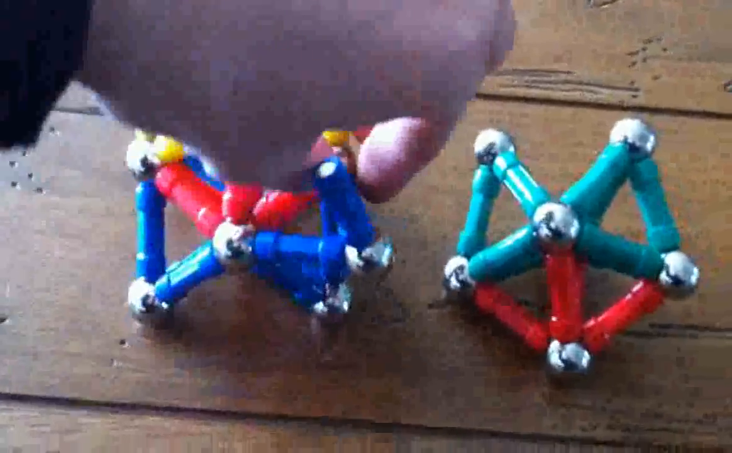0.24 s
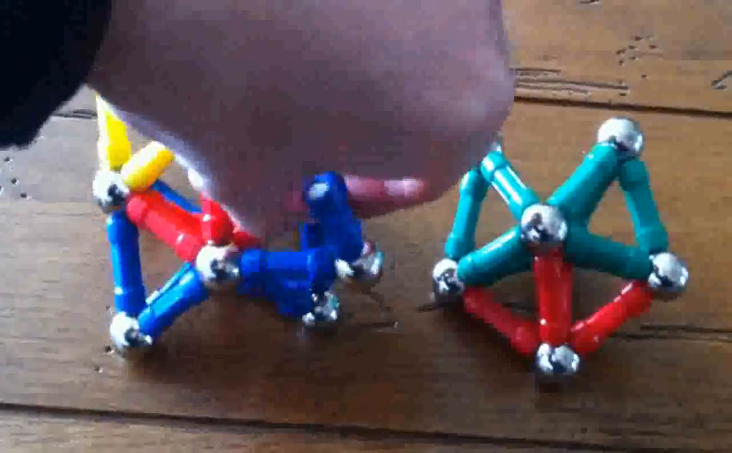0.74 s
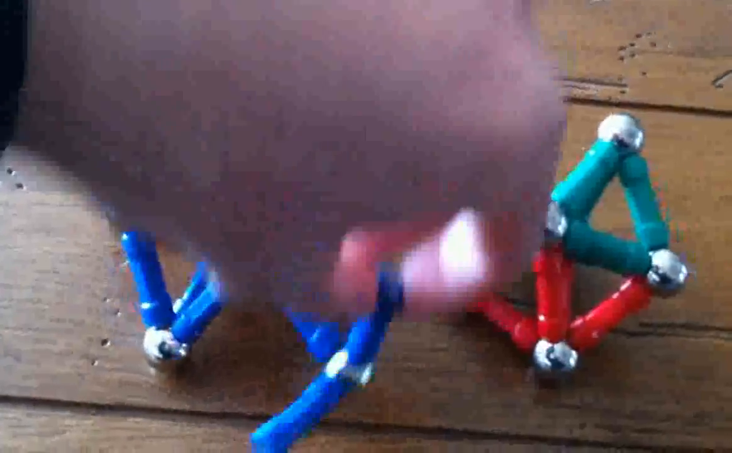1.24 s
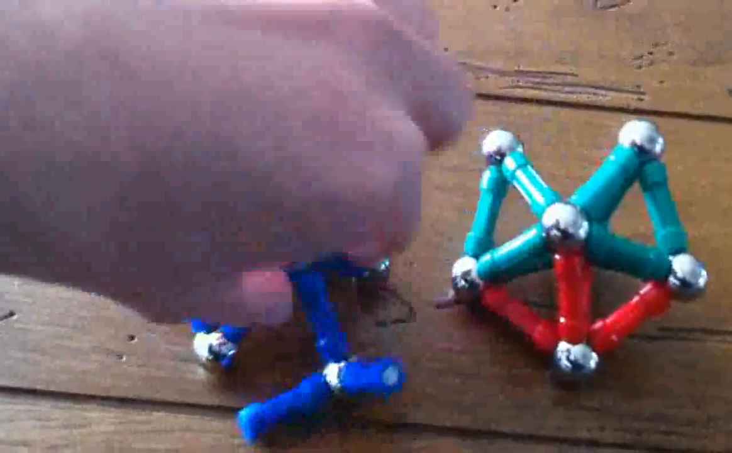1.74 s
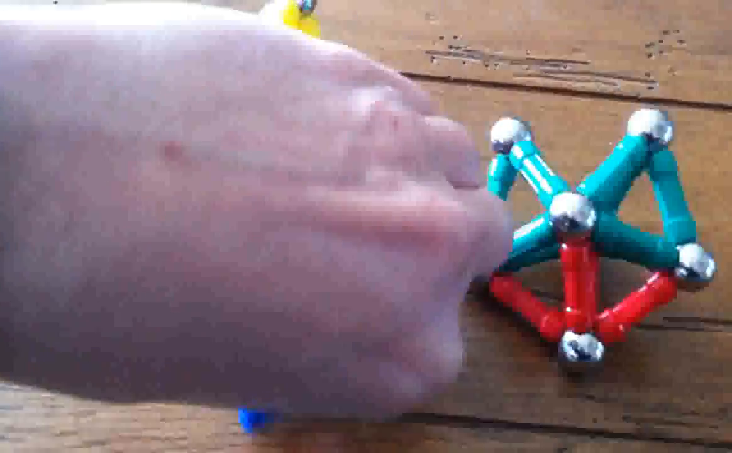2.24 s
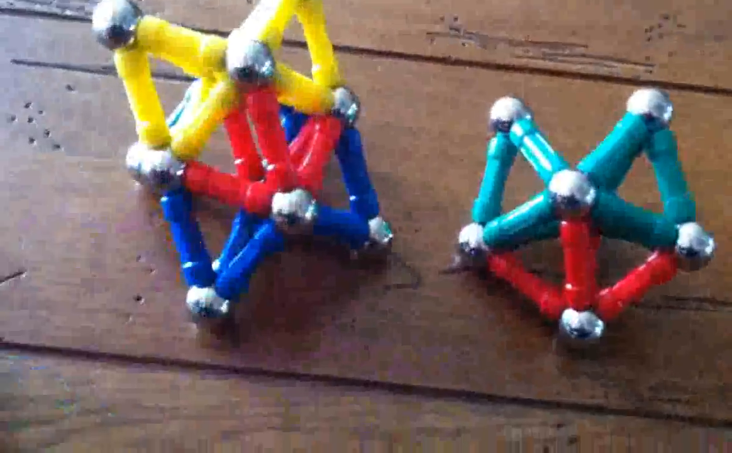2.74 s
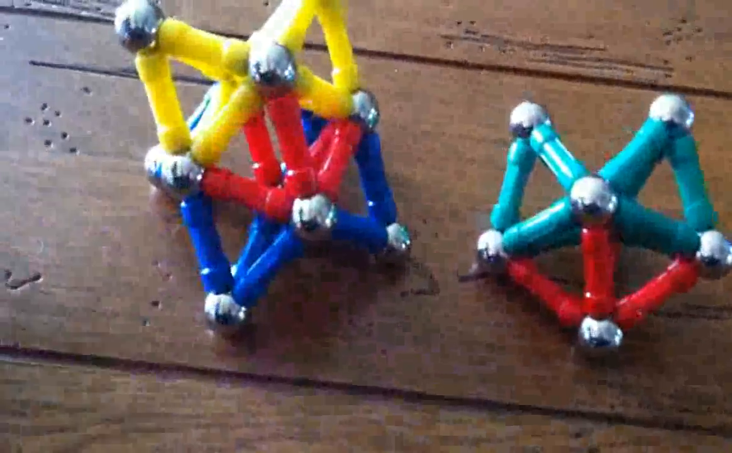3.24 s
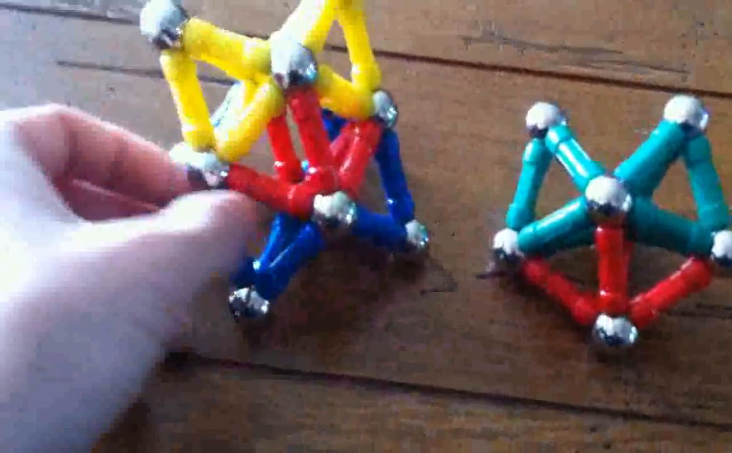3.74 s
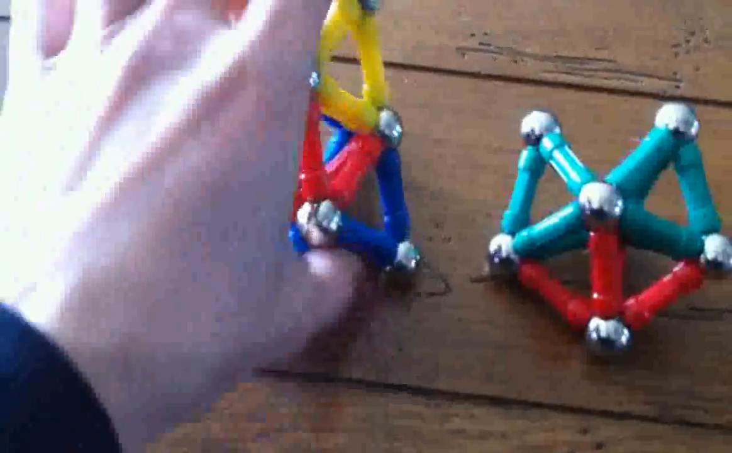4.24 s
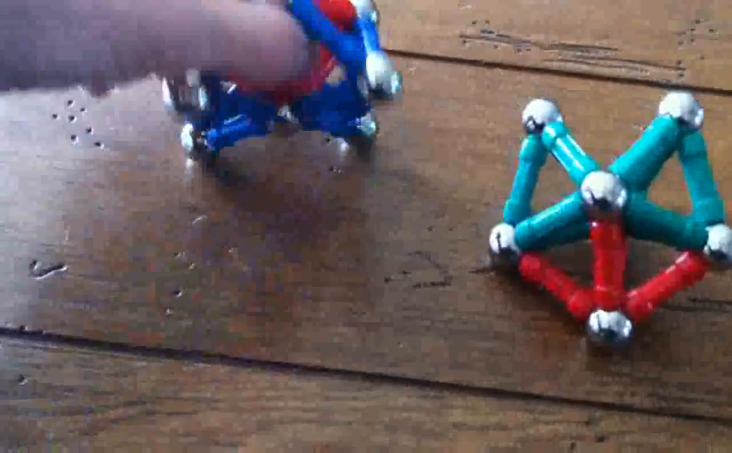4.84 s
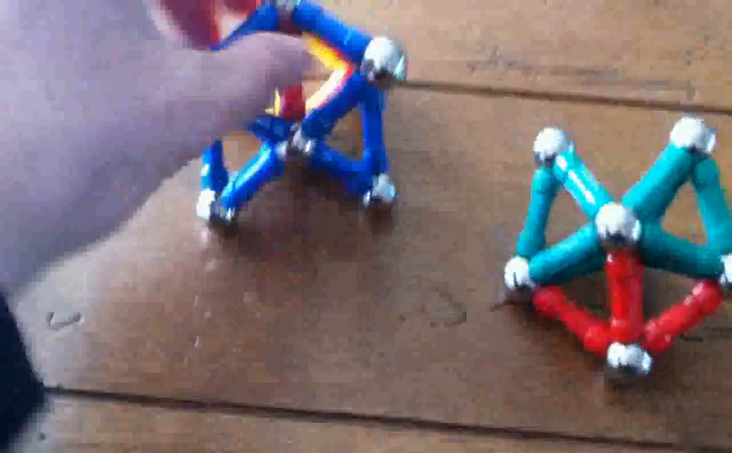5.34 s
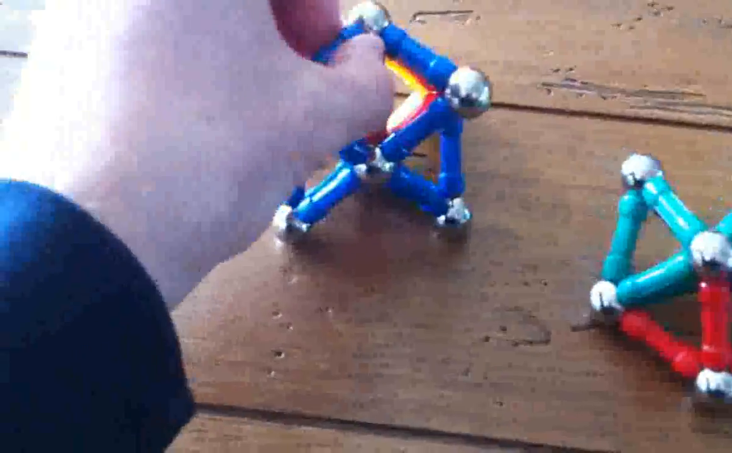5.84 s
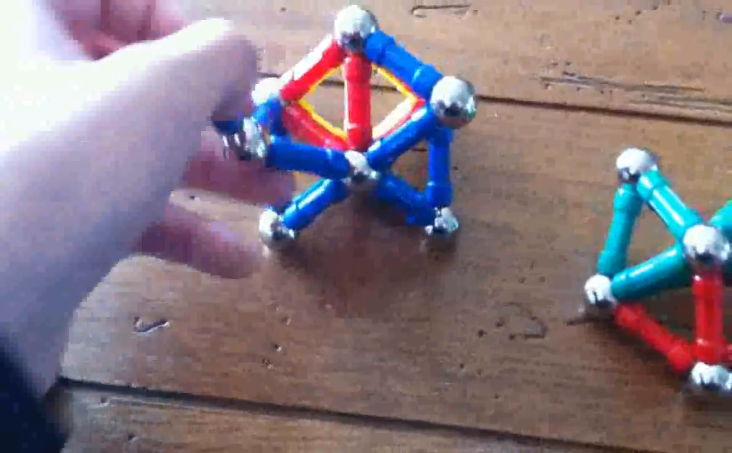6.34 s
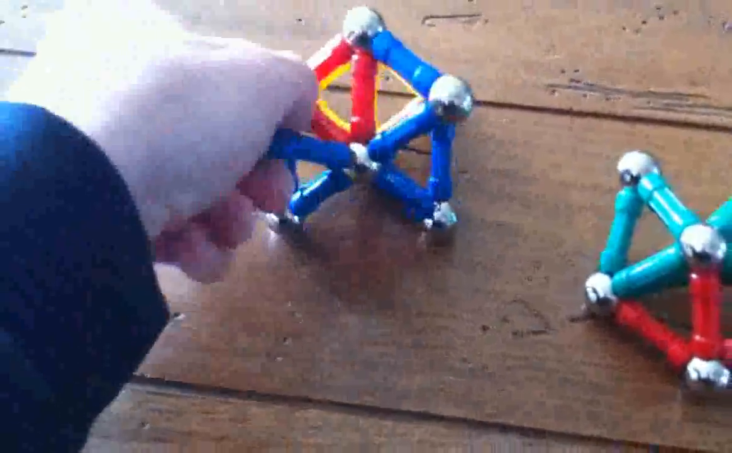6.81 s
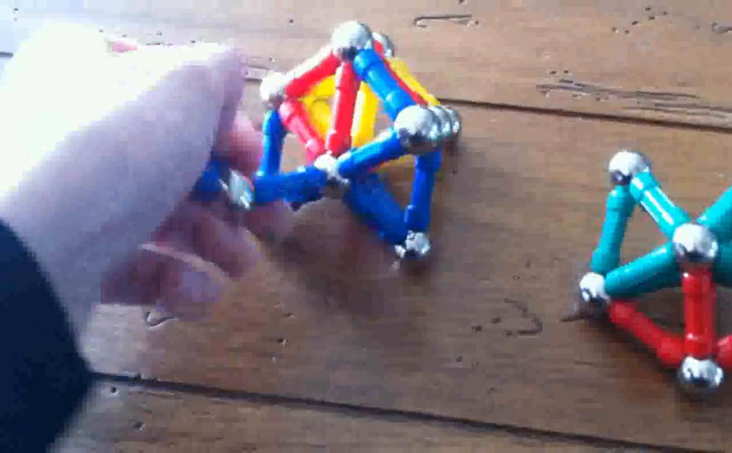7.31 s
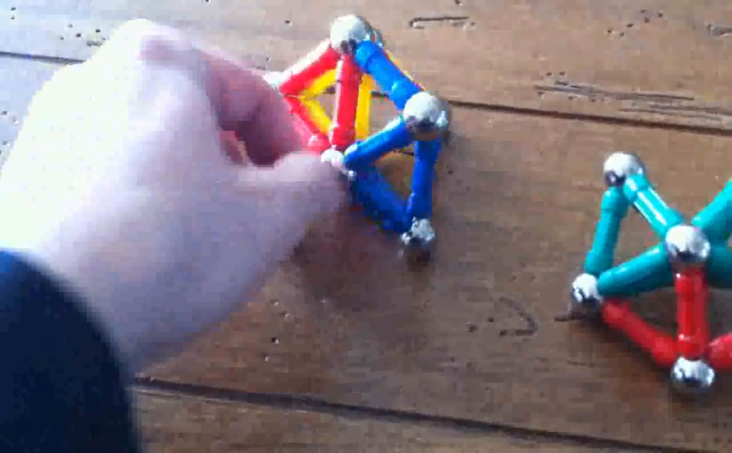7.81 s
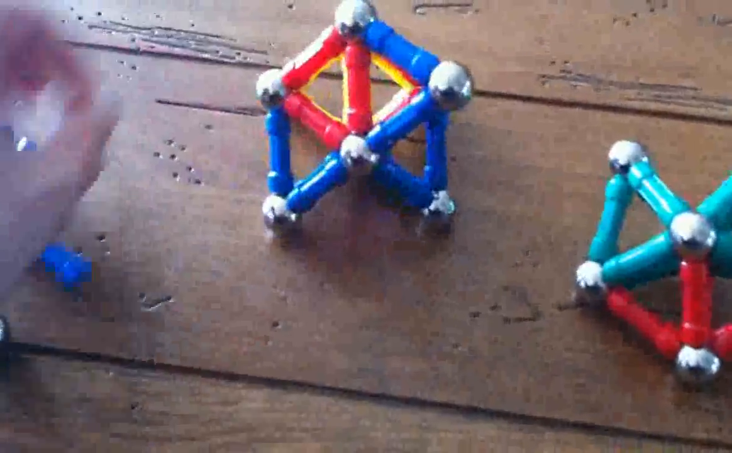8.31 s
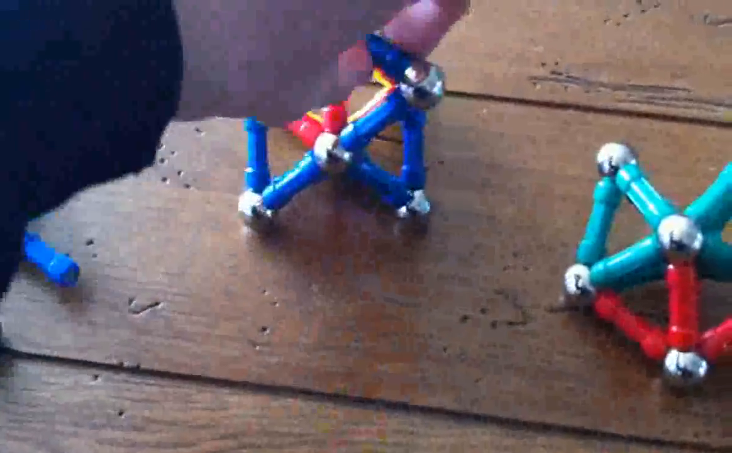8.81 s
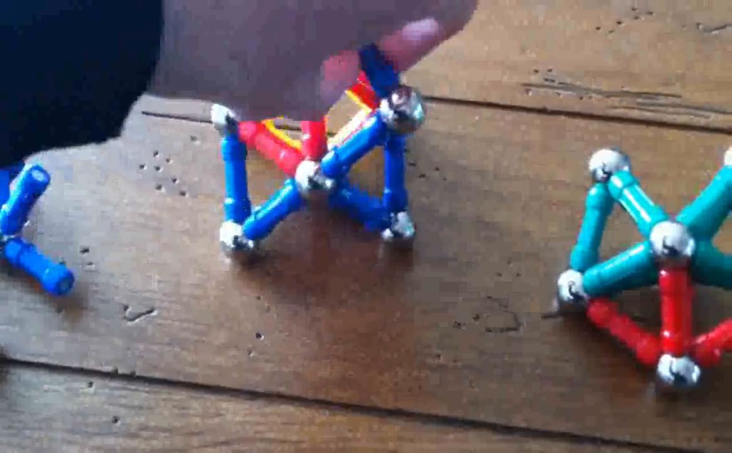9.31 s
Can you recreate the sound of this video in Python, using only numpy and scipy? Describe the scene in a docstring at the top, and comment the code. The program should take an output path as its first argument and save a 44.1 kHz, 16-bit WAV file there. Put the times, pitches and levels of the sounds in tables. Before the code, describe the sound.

Dull wooden knocks and short drags as a magnetic toy is handled on a table, broken by loud slaps and bright steel snaps.

```python
"""Dull wooden knocks, dragging rumbles and hard steel clicks: a hand pulls apart a frame of magnetic rods and balls.
Balls rock, rebound and drag on a wooden table, whose modes ring; pieces slap and snap together, ringing resonances
through a crack and a chatter of tiny bounces. Skids and arm rustles are coloured noise.
A small camera microphone close by hisses; its limiter ducks after loud bursts, and its band is narrow."""
import sys
import numpy as np
from scipy import signal
from scipy.io import wavfile
from scipy.ndimage import uniform_filter1d, minimum_filter1d

SR = 44100
rng = np.random.default_rng(int(sys.argv[2]) if len(sys.argv) > 2 else 0)


def persist_wave(psi):
    """Save psi, clipped to +-1, as 16-bit WAV."""
    counts = np.round(np.clip(psi, -1, 1) * 32767).astype(np.int16)
    wavfile.write(sys.argv[1], SR, np.atleast_2d(counts).T)


N = 421596
TIME = np.arange(N) / SR
AGE = TIME[:SR // 2]  # time since a blow, s
EDGES = np.geomspace(30, 9000, 25)  # noise band edges, Hz
CENTRES = np.sqrt(EDGES[1:] * EDGES[:-1])
# windows in samples: 20 ms for the loudness of a knock, 3 ms for that of a snap
ATTACK, CRACK = SR // 50, SR // 333

# modes of the table top with the frame on it: [f/Hz, level/dB, t60/s]
TABLE_MODES = [(138.1, -15, 0.58), (188.9, -5.5, 0.31), (222.4, -2.5, 0.44), (272, -13, 0.18),
               (283.9, -0.5, 0.29), (329.9, 4.5, 0.25), (356.8, -1.5, 0.24), (381, 0.5, 0.28),
               (436.4, -1.5, 0.17), (496, -15.5, 0.39), (581, -11.5, 0.18), (629, -9.5, 0.073),
               (700, -12.5, 0.23), (777, -11, 0.17), (870, -24, 0.27), (907, -6, 0.11), (968, -17, 0.24),
               (1093, -9.5, 0.067), (1252, -7, 0.078), (1360, -14.5, 0.24), (1485, -15, 0.084),
               (1645, -11.5, 0.12), (1960, -28, 0.068), (2000, -31.5, 0.1), (2340, -18.5, 0.11),
               (2560, -20, 0.063)]
# balls dragged over the wood: [start/s, strongest/s, end/s, level at the strongest/dB]
# a row that ends before its strongest is cut off while it swells
DRAGS = [(.46, .49, .54, -28), (.685, .705, 0.91, -18.5), (1.12, 1.15, 1.3, -22), (1.39, 1.46, 1.71, -26),
         (2.05, 2.11, 2.39, -23), (4.44, 4.59, 4.52, -17.5), (4.76, 4.82, 5.0, -26.5),
         (5.03, 5.1, 5.2, -29.5), (5.19, 5.28, 5.3, -15), (7.28, 7.345, 7.55, -19)]
DRAG_FADE_DB = 15.5  # how far below its strongest a full drag starts and ends


def from_db(db):
    """Decibels to gain."""
    return 10 ** (np.asarray(db) / 20)


def at_hz(points, hz):
    """Read a table along a log-frequency axis."""
    f, value = np.transpose(points)
    return np.interp(np.log(hz), np.log(f), value)


def rms(x):
    """Root mean square along time."""
    return np.sqrt(np.mean(x ** 2, axis=-1, keepdims=True) + 1e-20)


def dying(t60):
    """Exponential decays, each falling 60 dB in its t60."""
    return from_db(-60 * AGE / np.asarray(t60)[..., None])


def add(out, s, sound):
    """Mix a sound in at time s."""
    i = min(int(s * SR), N)
    out[i:i + len(sound)] += sound[:N - i]


def bandpass(x, low_hz, high_hz, order=4):
    """Butterworth band-pass."""
    return signal.sosfilt(signal.butter(order, [low_hz, high_hz], "band", fs=SR, output="sos"), x)


def noise_bands():
    """Noise in bands about a third of an octave wide, rms 1 each."""
    white = rng.standard_normal((2, N + len(AGE)))
    bands = [bandpass(white[k % 2], EDGES[k], EDGES[k + 1], order=2) for k in range(len(CENTRES))]
    bands = np.array(bands)
    return bands / rms(bands)


def band_gains(colour):
    """Gain of each band for a spectrum in dB per Hz, total power 1."""
    gains = from_db(at_hz(colour, CENTRES)) * np.sqrt(np.diff(EDGES))
    return gains / np.linalg.norm(gains)


def swells(moves, fade_db):
    """Gain over time: each move of the hand swells towards its strongest and fades, within its start and end."""
    gain = np.zeros(N)
    for start, strongest, end, db in moves:
        swell_db = np.interp(TIME, [start, strongest, end], [-fade_db, 0, -fade_db])
        gain += from_db(db + swell_db) * (TIME >= start) * (TIME < end)
    return gain


def knocks(bands, ring_db=-1.5, thud_db=-5.0, room_db=-16.0, room_rise_s=0.0027,
           tap_db=0.0, tap_hz=1200, tap_t60=0.0015):
    """Each blow starts with a tap, rings the table's modes, gives a thud of dense modes and wakes the room."""
    # the crowd of weaker table modes: [f/Hz, level per Hz/dB]
    thud_colour = [(50, -56.5), (100, -43), (200, 0.5), (350, 0.5), (530, -12), (900, -12.5), (1400, -16),
                   (2300, -21.5), (3200, -32), (4000, -26.5), (7000, -50.5)]
    # how fast a blow dies in the wood: [f/Hz, t60/s]
    wood_t60 = [(200, 0.14), (800, 0.06), (2500, 0.098), (6000, 0.06)]
    # how fast it dies in the room: [f/Hz, t60/s]
    room_t60 = [(150, 0.55), (400, 0.64), (1000, 0.44), (2500, 0.25), (7000, 0.12)]
    out = np.zeros(N)
    room = from_db(room_db) * dying(at_hz(room_t60, CENTRES)) * (1 - np.exp(-AGE / room_rise_s))
    decay = np.hypot(dying(at_hz(wood_t60, CENTRES)), room)
    tap = np.sin(2 * np.pi * tap_hz * AGE) * dying(tap_t60)
    modes = table_modes()
    for s, db, lift in blows():
        i = min(int(s * SR), N)
        thud = bands[:, i:i + len(AGE)] * decay
        gains = band_gains(thud_colour) * from_db(at_hz(lift, CENTRES))
        thud = (gains / rms(thud[:, :ATTACK])[:, 0]) @ thud
        sound = from_db(tap_db + at_hz(lift, tap_hz)) * tap
        sound = sound + from_db(thud_db) * thud
        sound = sound + from_db(ring_db) * table_ring(modes, lift)
        add(out, s, from_db(db) * sound)
    return out


def blows():
    """All that strikes the table, as (s, dB, colour): slams, knocks with their rebounds, and trips."""
    # a section of the frame slams flat: [t/s, bass level/dB, lift at 900 Hz/dB, lift at 2400 Hz/dB]
    slam_hits = [(1.7439, -15.5, 18, 10), (3.0957, -20, 22, 4), (3.3449, -32, 23, 7),
                 (5.2917, -10, 21.5, -9.5), (8.3654, -13.5, 2.5, -24)]
    # a ball of the frame knocks: [t/s, level before colouring/dB, contact corner f/Hz]
    # a harder, shorter contact reaches higher
    knock_hits = [(0.6973, -24.5, 1200), (0.7277, -33, 1600), (0.751, -28, 550), (0.7752, -24, 1800),
                  (0.8417, -25, 1300), (0.894, -24.5, 1790), (0.9677, -24, 910), (1.0595, -29.5, 754),
                  (1.134, -24, 515), (1.1515, -25.5, 1600), (1.287, -30.5, 730), (1.453, -34, 880),
                  (1.602, -33, 600), (1.774, -20, 1100), (2.0623, -30.5, 1200), (2.14, -29.5, 750),
                  (2.2118, -28.5, 1100), (2.2747, -26, 1010), (2.472, -30.5, 1100), (2.4882, -18.5, 1800),
                  (2.613, -28.5, 760), (2.6338, -22, 1244), (3.275, -35.5, 900), (4.096, -39, 490),
                  (4.5063, -28.5, 800), (4.5444, -26.5, 1700), (4.5982, -23.5, 1480), (4.835, -36.5, 1194),
                  (5.098, -39.5, 1296), (5.268, -26, 1390), (5.2923, 1, 171), (5.3196, -7, 330),
                  (5.342, -13, 210), (5.5076, -24.5, 550), (5.765, -27, 830), (5.8707, -24, 2100),
                  (5.9242, -20, 2480), (6.038, -35, 1000), (6.1158, -24.5, 1601), (6.2308, -24, 1600),
                  (6.2799, -23, 1500), (6.3713, -21.5, 2450), (6.6044, -23, 917), (6.7592, -24, 1000),
                  (6.7887, -24, 751.4), (6.9865, -16, 2800), (7.044, -19.5, 2400), (7.1167, -24, 850),
                  (7.172, -23.5, 2100), (7.228, -22, 2700), (7.5635, -20, 900), (7.574, -20.5, 1952),
                  (7.8484, -25.5, 780), (7.8727, -19.5, 2110), (8.0497, -23, 650), (8.0706, -21.5, 2690),
                  (8.094, -18.5, 1050), (9.0064, -20.5, 1510), (9.02, -21.5, 2000), (9.101, -18.5, 3000),
                  (9.126, -26, 650), (9.1483, -29, 2400), (9.178, -24, 520), (9.3376, -27.5, 960),
                  (9.379, -23.5, 4000), (9.5026, -20, 2010)]
    # after each knock the frame rocks and lands once more, weaker and softer
    rebound_s, jitter, loss_db, corner_share = 0.024, 0.3, 13, 0.58
    out = [(s, db, [(380, 0.015), (900, mid_db), (2400, top_db)]) for s, db, mid_db, top_db in slam_hits]
    for s, db, corner_hz in knock_hits:
        delay = rebound_s * (1 + jitter * rng.uniform(-1, 1))
        out.append((s, db, contact_lift(corner_hz)))
        out.append((s + delay, db - loss_db, contact_lift(corner_hz * corner_share)))
    return out + trips()


def trips(per_s=18, level_db=-9.5, spread_db=0.5, corner_hz=620):
    """A dragged ball trips in soft knocks at uneven intervals that follow the push, as (s, dB, colour)."""
    push = swells(DRAGS, DRAG_FADE_DB)
    out = []
    for slot in range(int(N / SR * per_s) - 1):
        s = (slot + rng.random()) / per_s
        size_db = rng.uniform(-spread_db, spread_db)
        strength = push[int(s * SR)]
        if strength > 0:
            out.append((s, 20 * np.log10(strength) + level_db + size_db, contact_lift(corner_hz)))
    return out


def contact_lift(corner_hz, steepness=6.5):
    """Colour of a knock as (Hz, dB): above the corner, power falls with frequency to the steepness."""
    # steel on wood favours the middle: [f/Hz, lift/dB]
    steel_lift = [(130, -1), (380, 0), (900, 2.5), (2400, 3.5)]
    return [(hz, db - 10 * np.log10(1 + (hz / corner_hz) ** steepness)) for hz, db in steel_lift]


def table_modes():
    """The free ring of each of the table's modes, a dying sine."""
    hz, db, t60 = np.transpose(TABLE_MODES)
    return from_db(db)[:, None] * np.sin(2 * np.pi * hz[:, None] * AGE) * dying(t60)


def table_ring(modes, lift, spread_db=4.5):
    """The table's modes; every point of contact gives them other strengths and signs."""
    hz = np.transpose(TABLE_MODES)[0]
    strength = from_db(rng.normal(0, spread_db, len(hz))) * rng.choice([-1, 1], len(hz))
    ring = (strength * from_db(at_hz(lift, hz))) @ modes
    return ring / rms(strength @ modes[:, :ATTACK])


def drags(level_db=-10.0, bumps_per_s=250, mid_db=-3.0, top_db=-16.5):
    """The grain of the wood bumps a dragged ball; the bumps ring the table softly."""
    bumps = (rng.random(N) < bumps_per_s / SR) * rng.standard_normal(N)
    lift = [(380, 0.025), (900, mid_db), (2400, top_db)]
    ring = table_ring(table_modes(), lift, spread_db=1.5)
    rumble = signal.fftconvolve(bumps, ring)[:N]
    return from_db(level_db) * swells(DRAGS, DRAG_FADE_DB) * rumble / rms(rumble)


def table_top(force, low_hz=125, high_hz=3300):
    """The board radiates no deep bass, and the wood soaks up the treble."""
    return bandpass(force, low_hz, high_hz)


def clacks():
    """Pieces slapping onto the frame or the table ring the jointed frame."""
    # slaps: [t/s, loudest level/dB, chatter t60/s, tilt per octave/dB]
    clack_hits = [(1.7441, -5.5, 0.069, -3.5), (3.096, 3, 0.045, -1.5), (3.121, -2, 0.028, -6.5),
                  (3.345, -19, 0.044, -9.5), (3.355, -17.5, 0.16, -9), (5.2932, -5, 0.05, -6.5),
                  (5.3193, -30, 0.022, 2), (8.367, 3.5, 0.043, -1), (8.3956, -2, .04, -2),
                  (8.4335, -8, .016, -5.5), (8.451, -11, 0.095, -7), (8.578, -20, .036, -8.5),
                  (8.6419, -19, 0.1, 0), (8.6607, -15.5, 0.01, -7), (8.7252, -22.5, 0.091, 1)]
    # resonances of the jointed frame: [f/Hz, width/Hz, level/dB]
    frame = [(416, 90, -3.5), (668, 250, 0.5), (784, 90, 6), (925, 105, -2), (1075, 54, 2.5),
             (1260, 380, 0), (1656, 170, 0.5), (1820, 88, 5), (2347, 180, 2), (2635, 250, -4),
             (3076, 680, -6)]
    return snaps(clack_hits, frame, room_db=-14.0, room_t60=0.45, crack=8.4, bounces_per_s=2200)


def clicks():
    """Steel meeting steel rings the high resonances of a rod on a ball."""
    # clicks: [t/s, loudest level/dB, chatter t60/s, tilt per octave/dB]
    click_hits = [(1.745, -21.5, 0.017, -2.5), (3.006, -35, 0.035, -7), (3.095, -7, 0.01, 29),
                  (3.113, 8, 0.02, -8), (3.1132, -9.5, .014, 18), (3.1285, -21, .012, 4),
                  (3.163, -20, 0.027, 11), (3.306, -26.5, .039, -8), (5.2932, 0.5, 0.014, -3),
                  (8.3811, 1.5, 0.028, 6), (8.3892, 3, .013, 10.5), (8.4576, 3, 0.0051, 8),
                  (8.468, -20, .045, -9), (8.6424, -16, 0.049, -2), (8.6598, -12.5, 0.0039, 5),
                  (8.669, -21, .031, -14), (8.7257, -21, .027, 0.5)]
    # resonances of a rod clicking on a ball: [f/Hz, width/Hz, level/dB]
    rod = [(760, 1300, -13.5), (2020, 140, -6), (2760, 960, -3), (3850, 320, 0), (4460, 1400, -8),
           (5590, 400, -1), (6220, 520, -6.5), (7070, 180, -5), (12300, 2400, -17)]
    return snaps(click_hits, rod, room_db=-28.0, room_t60=0.33, crack=5.6, bounces_per_s=1700)


def snaps(hits, resonances, room_db, room_t60, crack, bounces_per_s, spread_db=1.5):
    """A magnet hits with a crack and chatters to rest in tiny bounces; the part rings, then the room."""
    out = np.zeros(N)
    share = np.clip(bounces_per_s / SR, 0.01, 1)  # chance of a bounce in each sample
    # a small part radiates little below its lowest resonance or above its highest
    low_hz = 0.81 * resonances[0][0]
    high_hz = min(1.7 * resonances[-1][0], 0.45 * SR)
    for s, db, t60, tilt_db in hits:
        bounces = (rng.random(len(AGE)) < share) * rng.choice([-1, 1], len(AGE)) / np.sqrt(share)
        room = from_db(room_db) * rng.standard_normal(len(AGE)) * dying(room_t60)
        # the room comes up as the chatter dies
        force = bounces * dying(t60) + room * (1 - dying(t60))
        force[0] = crack
        sound = np.zeros(len(AGE))
        for k, (hz, width, mode_db) in enumerate(resonances):
            gain_db = mode_db + tilt_db * np.log2(hz / 2000) + rng.normal(0, spread_db)
            ring = signal.lfilter(*signal.iirpeak(hz, hz / width, fs=SR), force)
            sound += (-1) ** k * from_db(gain_db) * ring
        sound = bandpass(sound, low_hz, high_hz)
        loudest = np.sqrt(uniform_filter1d(sound ** 2, size=CRACK, mode="constant").max())
        add(out, s, from_db(db) * sound / loudest)
    return out


def skids(bands):
    """Loose pieces skid: coloured noise that starts at once and grows as the magnets draw together."""
    # skids: [start/s, end/s, level at the end/dB, growth per s/dB]
    skid_moves = [(2.927, 3.094, -30, 28), (8.28, 8.369, -31, 362)]
    # spectrum of the skidding: [f/Hz, level per Hz/dB]
    skid_colour = [(100, -41), (500, -13.5), (750, -1), (1300, -3.5), (1900, -7), (3000, -14), (4200, -26),
                   (8000, -34)]
    gain = np.zeros(N)
    for start, end, db, growth in skid_moves:
        gain += from_db(db - growth * np.abs(end - TIME)) * (TIME >= start) * (TIME < end)
    return gain * (band_gains(skid_colour) @ bands[:, :N])


def rustles(bands):
    """Faint rustles as the arm moves: coloured noise under gentle swells."""
    # rustles: [start/s, strongest/s, end/s, level/dB]; a row that ends before its start is silent
    rustle_moves = [(0, .1, 1, -56), (3.68, 3.85, 3.95, -43), (7.4, 8.1, 6.3, -48)]
    # spectrum of the rustling: [f/Hz, level per Hz/dB]
    rustle_colour = [(100, -13), (300, 3), (700, -2.5), (1500, -7.5), (3000, -4), (7500, -8.5)]
    return swells(rustle_moves, fade_db=2) * (band_gains(rustle_colour) @ bands[:, -N:])


def room_floor(bands, level_db=-45.5):
    """Steady room tone and microphone hiss, from the noise bands read backwards."""
    # spectrum of the floor: [f/Hz, level per Hz/dB]
    floor_colour = [(30, -8.5), (80, -13.5), (150, 2), (230, 2), (330, -0.5), (480, -5), (800, -4.5),
                    (1500, -6), (3500, -9), (6000, -10), (7500, -5.5), (8800, -27.5)]
    return from_db(level_db) * (band_gains(floor_colour) @ bands[:, ::-1][:, :N])


def scene():
    """Blows, friction, snaps and the floor, in one channel."""
    bands = noise_bands()
    wood = table_top(knocks(bands) + drags())
    steel = clacks() + clicks()
    background = skids(bands) + rustles(bands) + room_floor(bands)
    return (wood + steel + background)[None]


def limiter(x, ceiling_db=-7.0, release_s=0.86):
    """Bursts over the ceiling pull the gain down at once; it creeps back over about a second."""
    level_db = 10 * np.log10(np.abs(uniform_filter1d(x[0] ** 2, size=CRACK)) + 1e-12)
    over = np.maximum(level_db - ceiling_db, 1e-6)
    # the excess in dB jumps up with each burst and decays exponentially
    held = np.exp(np.maximum.accumulate(np.log(over) + TIME / release_s) - TIME / release_s)
    # a running maximum looks slightly ahead of each burst
    ahead = -minimum_filter1d(-held, size=CRACK)
    return x * from_db(-uniform_filter1d(ahead, size=CRACK))


def record(dry, lopsided=0.078, overload=0.88, cutoff_hz=8150):
    """The limiter, a slightly lopsided overload on peaks that slip past it, then the camera's narrow band."""
    x = limiter(dry)
    x = x / (1 + (x / overload) ** 4) ** 0.25
    x = x - lopsided * x ** 2
    return signal.sosfilt(signal.cheby1(14, 0.1, cutoff_hz, fs=SR, output="sos"), x)


dry = scene()
out = record(dry)
persist_wave(out)
```